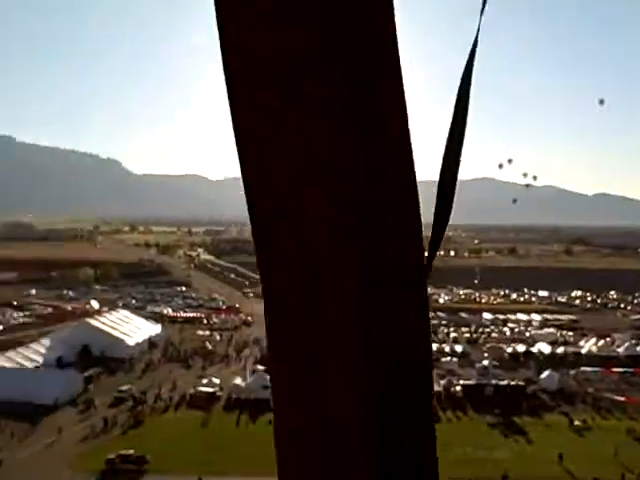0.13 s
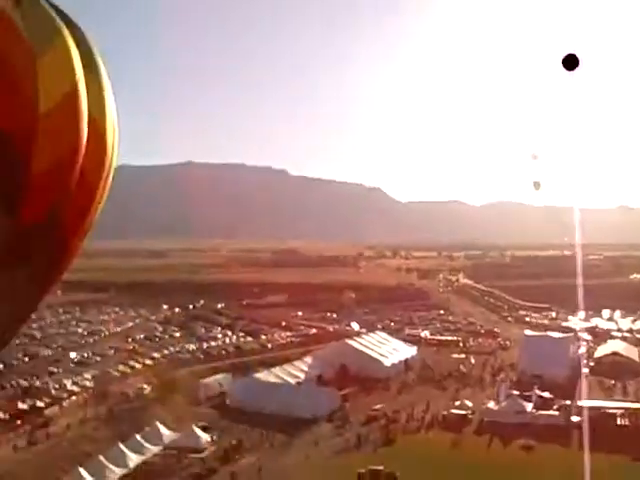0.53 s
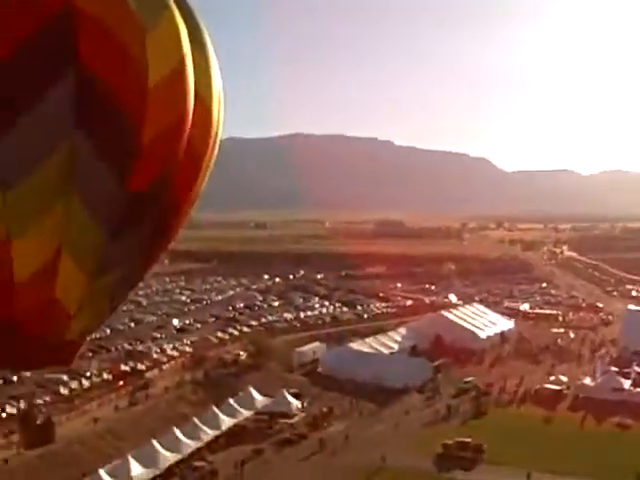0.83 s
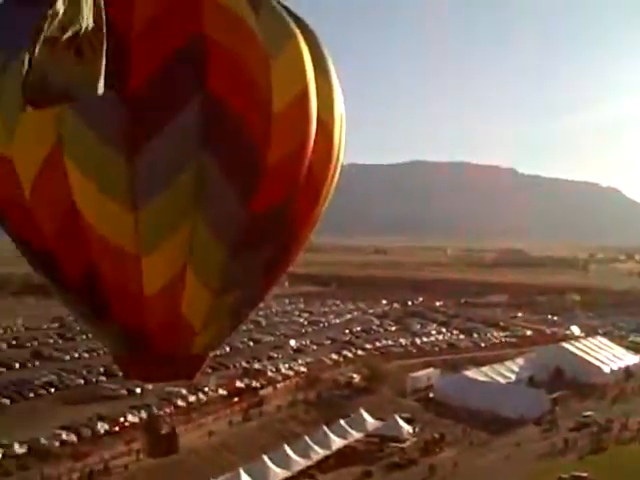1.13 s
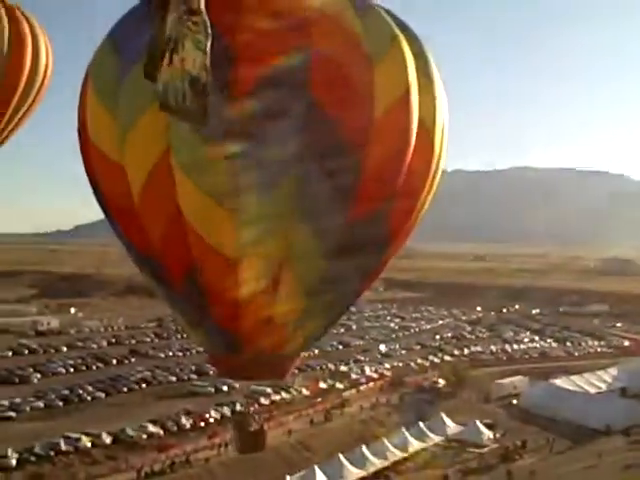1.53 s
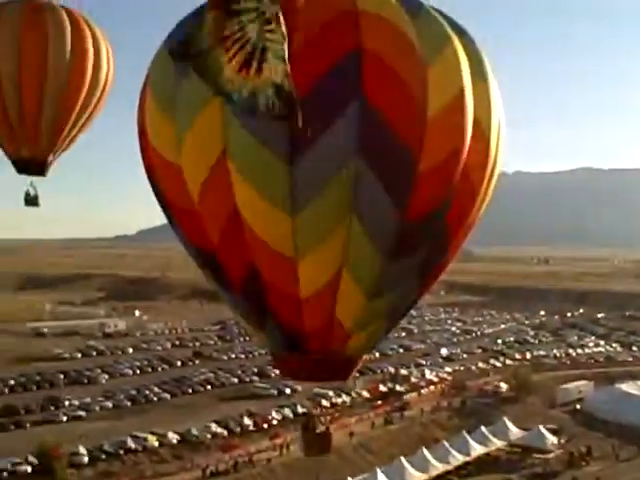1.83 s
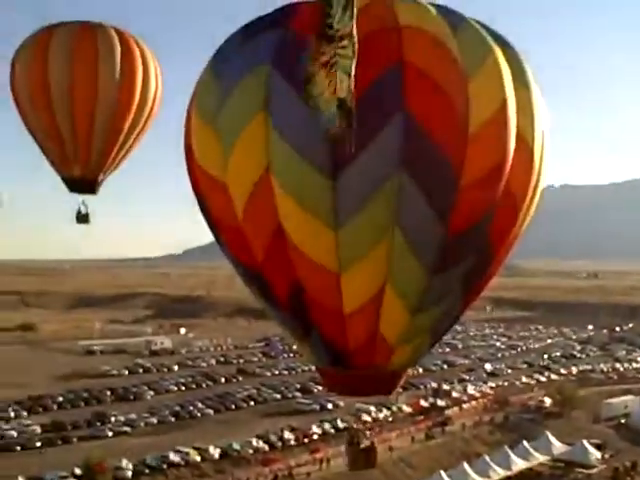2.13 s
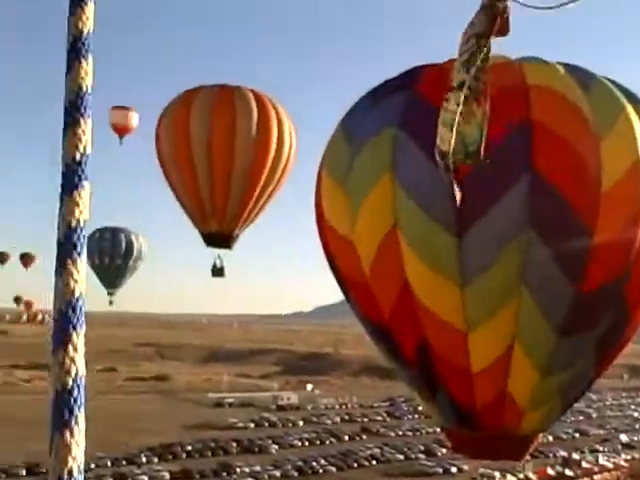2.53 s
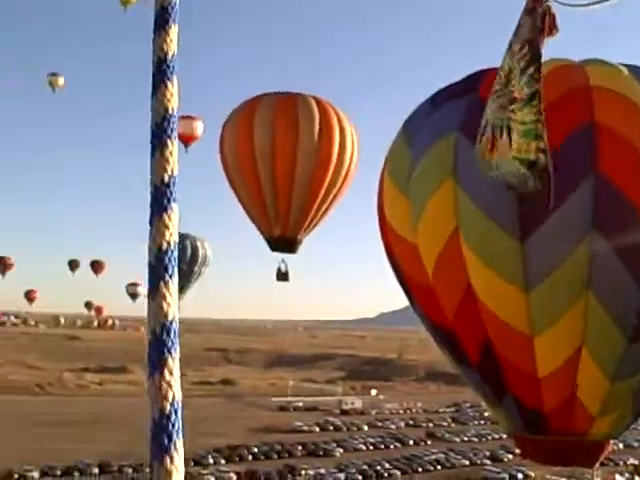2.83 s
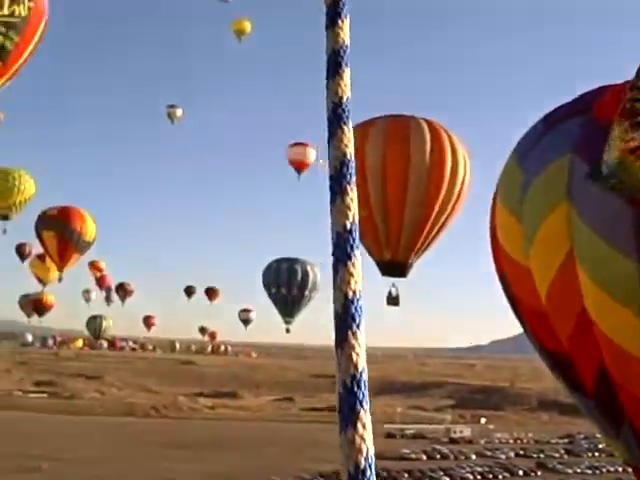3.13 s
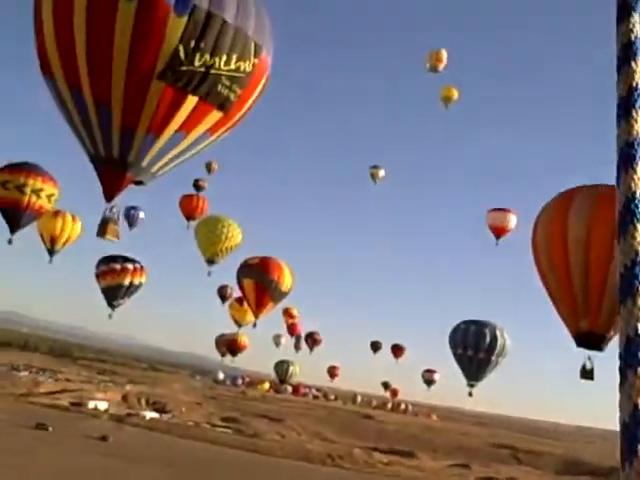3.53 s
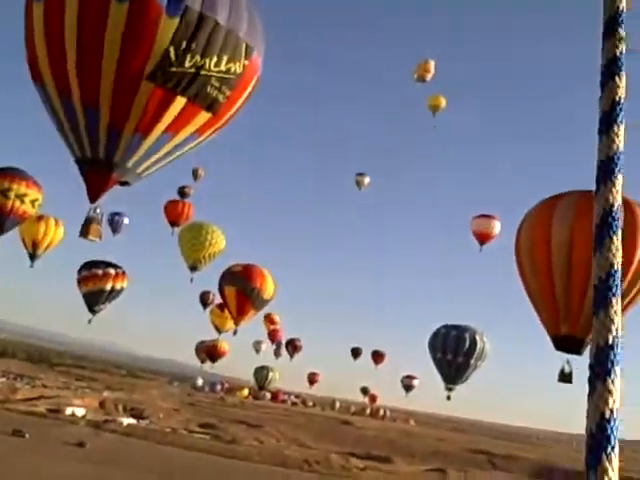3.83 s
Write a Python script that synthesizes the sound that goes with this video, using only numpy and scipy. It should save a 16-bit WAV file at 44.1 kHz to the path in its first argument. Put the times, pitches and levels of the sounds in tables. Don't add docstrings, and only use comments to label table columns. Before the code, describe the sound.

A balloon's gas burner roars overhead, overloading a small dull camera microphone, after low wind rumble and a neighbouring burner's softer hiss that swells, shuts off and leaves a brief lull, high in open air.

```python
import sys
import numpy as np
from scipy import signal
from scipy.fft import rfft, irfft, next_fast_len
from scipy.io import wavfile
from scipy.ndimage import uniform_filter1d, map_coordinates

SR = 44100
rng = np.random.default_rng(int(sys.argv[2]) if len(sys.argv) > 2 else 0)


def volts_from_db(level):
    exponent = np.asarray(level, float) / 20
    return 10 ** exponent


def file_out(sig):
    cols = np.atleast_2d(sig).T
    lim = np.clip(cols, -1, 1)
    pcm = np.round(lim * 32767).astype(np.int16)
    wavfile.write(sys.argv[1], SR, pcm)


N = 176400
T = np.arange(N) / SR


def unit(x):
    return x / np.sqrt(np.mean(x ** 2) + 1e-20)


def wobble(rate):
    return unit(map_coordinates(rng.standard_normal(size=400), [T * rate]))


def filtered(x, response):
    m = next_fast_len(N + 8192)
    hz = np.fft.rfftfreq(m, 1 / SR)
    return irfft(rfft(x, m) * response(hz), m)[..., :N]


def rush(spectrum, patchy_db, lifts=()):
    noise = signal.stft(rng.standard_normal(N), nperseg=512)[2]
    patches = uniform_filter1d(rng.standard_normal(noise.shape), size=6, axis=0)
    patches = uniform_filter1d(patches, size=10, axis=1)
    patchy = signal.istft(noise * volts_from_db(patchy_db * unit(patches)), nperseg=512)[1][:N]
    f, db = np.transpose(spectrum)

    def colour(hz):
        colour_db = np.interp(np.log(hz + 1), np.log(f + 1), db, -120, -120)
        for centre, breadth, lift_db in lifts:
            colour_db = colour_db + lift_db / (1 + (2 * (hz - centre) / breadth) ** 2)
        return volts_from_db(colour_db)

    return unit(filtered(patchy, colour))


def clip(x, top, hard):
    return x / (1 + np.abs(x / top) ** hard) ** (1 / hard)


def air():
    # (time [s], level [dB])
    wind = [
        (0, 0),
        (.4, -2),
        (.75, -0.5),
        (1.1, -2),
        (1.4, 1.5),
        (1.8, 2),
        (2.05, 1.5),
        (2.3, 1.5),
        (2.68, -.5),
        (4, -2),
    ]
    # (frequency [Hz], level [dB per Hz])
    rumble_colour = [(12, -48.5), (20, -11.5), (49, -1), (70, -4.5), (86, -3), (151, -5.5), (321, -13),
                     (852, -23.5), (1200, -32), (1560, -69.5), (2640, -120)]
    # (frequency [Hz], level [dB per Hz])
    hiss_colour = [(590, -41), (1000, -13.5), (1500, -11), (1610, -11), (1750, -12.5), (2100, -12.5),
                   (6080, -15.5), (8650, -32), (11200, -78.5), (19000, -120)]
    # (frequency [Hz], width [Hz], lift [dB])
    hiss_lifts = [(6300, 1200, 4.5), (4200, 600, 2.5)]
    wind_db = np.interp(T, *np.transpose(wind)) + 1.6 * wobble(18)
    rumble = volts_from_db(-30.5 + wind_db) * rush(rumble_colour, patchy_db=-0.1)
    return rumble + volts_from_db(-44.5) * rush(hiss_colour, 1.3, hiss_lifts)


def neighbour():
    # (time [s], gas flow [dB], flame over jet [dB])
    burn = [
        (0, -31, -16),
        (.3, -29.5, -13),
        (.8, -30, -18),
        (1.15, -28.5, -15.5),
        (1.35, -25, -11.5),
        (1.76, -24, -7),
        (1.93, -28.5, -4),
        (2.06, -37, 2.5),
        (2.2, -61, 2),
    ]
    # (frequency [Hz], level [dB per Hz])
    jet_colour = [(710, -52.5), (1200, -19), (1480, -16.5), (2310, -16), (2790, -14), (4930, -11.5),
                  (6160, -1.5), (7520, -10.5), (8650, -28), (11200, -41), (19000, -120)]
    # (frequency [Hz], width [Hz], lift [dB])
    jet_lifts = [(4450, 520, 2.5), (5030, 270, 1), (6270, 800, 1)]
    # (frequency [Hz], level [dB per Hz])
    flame_colour = [(40, -9), (160, 0), (300, 4), (500, -6.5), (850, -6), (1500, -22.5), (3200, -28)]
    s, gas_db, flame_over_db = np.transpose(burn)
    flow_db = np.interp(T, s, gas_db) - np.clip(T - s[-1], 0, 1) * 100
    jet_db = flow_db + 0.14 * wobble(8) + 0.49 * wobble(30.06)
    flame_db = flow_db + np.interp(T, s, flame_over_db) + 0.31 * wobble(12)
    jet = volts_from_db(jet_db) * rush(jet_colour, 0.91, jet_lifts)
    return jet + volts_from_db(flame_db) * rush(flame_colour, patchy_db=-0.5)


def creak():
    start_s, pitch_hz, fade_s = 2.309, 2450, 0.06
    t = np.clip(T - start_s, 0, None)
    scrape = rush([(pitch_hz * 0.75, -8), (pitch_hz * 0.9, -7), (pitch_hz, 0), (pitch_hz * 1.15, -10)],
                  patchy_db=1)
    return np.clip(t / 0.0053, 0, 1) * volts_from_db(-46 - 60 * t / fade_s) * scrape


def whistle():
    # (time [s], pitch [Hz], level [dB])
    glide = [
        (2.44, 2060, -76),
        (2.5, 2090, -64),
        (2.6, 2130, -64),
        (2.67, 2140, -76),
    ]
    s, hz, db = np.transpose(glide)
    tone = np.sin(2 * np.pi * np.cumsum(np.interp(T, s, hz)) / SR)
    return volts_from_db(np.interp(T, s, db, -120, -120) + 1.6 * wobble(25)) * tone


def burner_jet():
    # (time [s], level [dB])
    pressure = [
        (2.76, -2),
        (2.86, 2),
        (3.05, -2.5),
        (3.18, -.5),
        (3.45, -4.5),
        (3.6, -4),
        (3.76, -2),
        (4, -4.5),
    ]
    # (frequency [Hz], level [dB per Hz])
    jet_colour = [(530, -15.5), (900, -8), (2250, -8.5), (3230, -8.5), (4500, -2), (5040, -5), (5980, -1.5),
                  (7580, -9.5), (8650, -20.5), (11200, -48.5), (19000, -120)]
    # (frequency [Hz], width [Hz], lift [dB])
    nozzle = [(6000, 730, 1), (7520, 490, 4), (4400, 600, -1.5)]
    valve_s, opening_s, leak_db = 2.692, 0.058, -16
    t = np.clip(T - valve_s, 0, None)
    flow_db = leak_db * np.clip(1 - t / opening_s, 0, 1) + np.interp(T, *np.transpose(pressure))
    jet_db = -14 + flow_db + 0.45 * wobble(15) + 0.59 * wobble(35)
    return np.clip(t / 0.018, 0, 1) * volts_from_db(jet_db) * rush(jet_colour, 0.8, nozzle)


def burner_flame():
    # (time [s], level [dB])
    size = [
        (2.712, -21.5),
        (2.74, -11.5),
        (2.79, -10),
        (2.88, -2),
        (3.06, -5.5),
        (3.22, -3),
        (3.52, -7.5),
        (3.7, -6),
        (4, -6.5),
    ]
    # (frequency [Hz], level [dB per Hz])
    roar_colour = [(12, -32.5), (20, -5.5), (38, -4), (157, -2), (295, -3.5), (498, -13), (566, -7.5),
                   (715, -19), (1500, -29), (1950, -52), (3300, -120)]
    # (frequency [Hz], width [Hz], lift [dB])
    eddies = [(152.4, 34, 4.5), (282, 50, 1), (436, 51, 3.5), (570, 130, -0.5)]
    light_s, rise_s = 2.7105, 0.013
    t = np.clip(T - light_s, 0, None)
    boom = volts_from_db(12.5 - 60 * t / 0.09) * np.sin(2 * np.pi * 94.2 * t)
    puff = volts_from_db(7.5 - 60 * t / 0.038) * np.sin(2 * np.pi * 232 * t)
    thump = (1 - np.exp(-(t / rise_s) ** 2)) * (boom + puff)
    size_db = np.interp(T, *np.transpose(size)) + 0.4 * wobble(15)
    return thump + np.clip(t / 0.0023, 0, 1) * volts_from_db(size_db) * rush(roar_colour, 0.7, eddies)


def mirrored(x):
    # (frequency [Hz], level [dB])
    image_fade = [(8000, -3.5), (8200, -5.5), (8400, -11.5), (8600, -18.5), (8800, -24), (9000, -57),
                  (9300, -110)]
    half_rate_hz = 8000
    m = next_fast_len(N + 8192)
    z, hz = rfft(x, m), np.fft.rfftfreq(m, 1 / SR)
    k = round(half_rate_hz * m / SR)
    fade = volts_from_db(np.interp(hz[k:2 * k], *np.transpose(image_fade), right=-200))
    image = np.conj(z[..., k:0:-1]) * fade
    return irfft(np.concatenate([z[..., :k], image], axis=-1), m)[..., :N]


def scene():
    return (air() + neighbour() + creak() + whistle() + burner_jet() + burner_flame())[None]


def roll_off(x):
    return signal.sosfilt(signal.butter(12, 15830, fs=SR, output="sos"), x)


def record(dry):
    overloaded = clip(dry, top=0.7, hard=30)
    mix = clip(mirrored(overloaded), top=0.69, hard=36)
    return roll_off(mix)


dry = scene()
out = record(dry)
file_out(out)
```